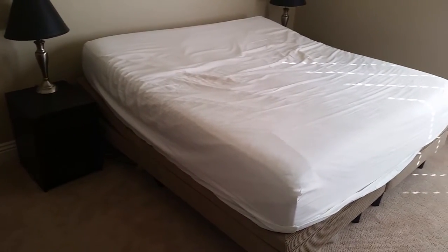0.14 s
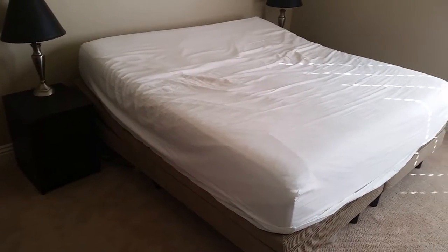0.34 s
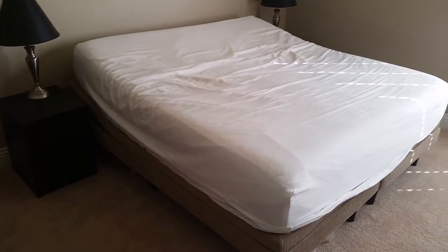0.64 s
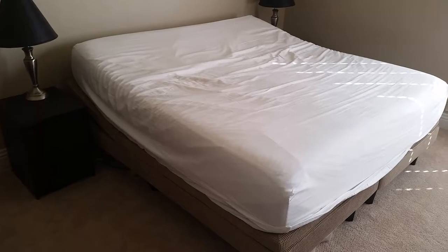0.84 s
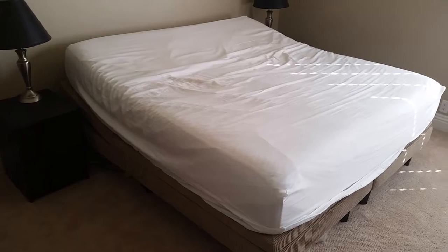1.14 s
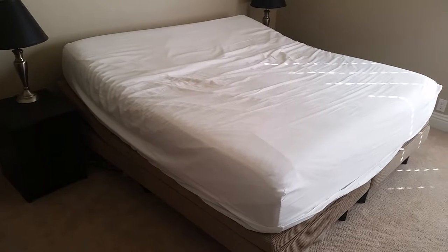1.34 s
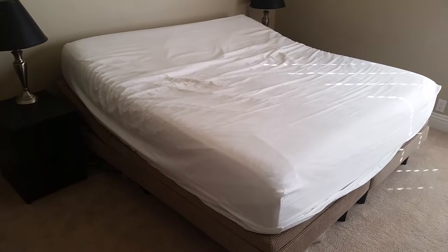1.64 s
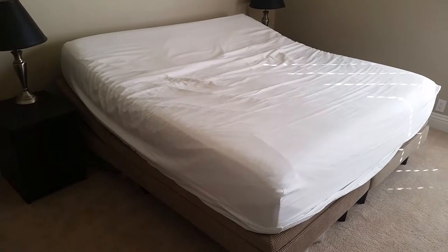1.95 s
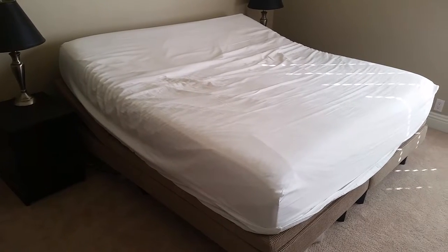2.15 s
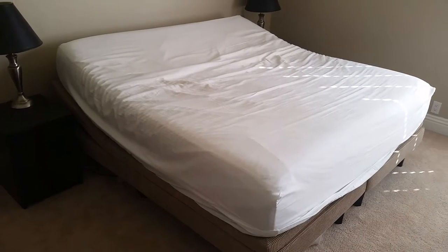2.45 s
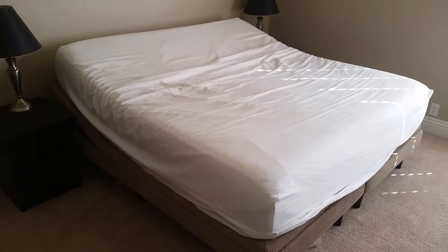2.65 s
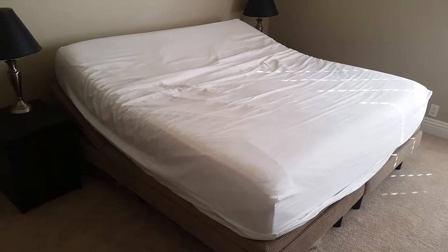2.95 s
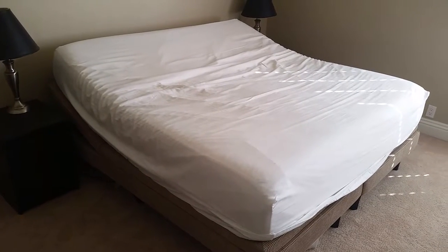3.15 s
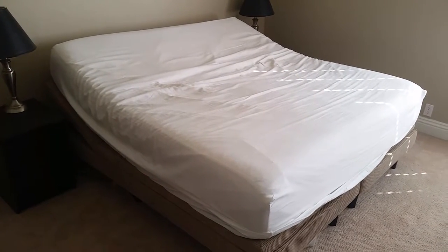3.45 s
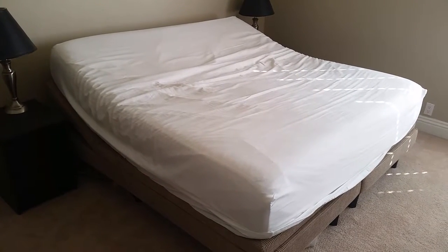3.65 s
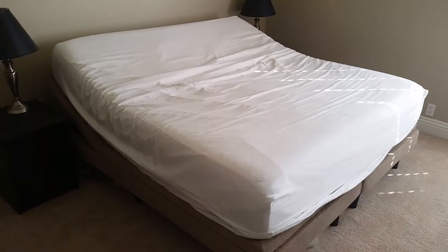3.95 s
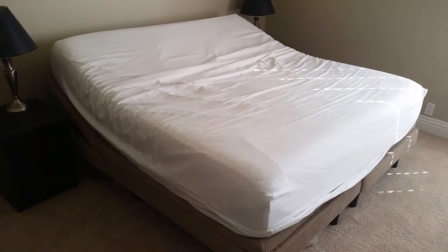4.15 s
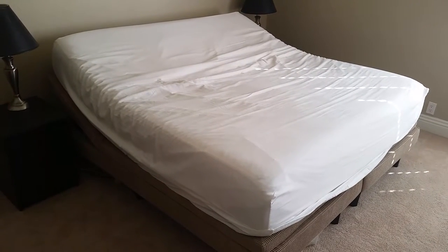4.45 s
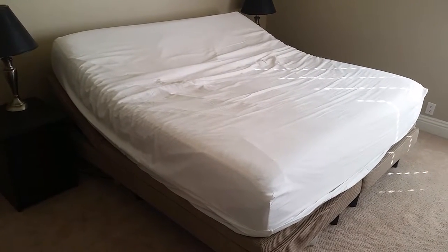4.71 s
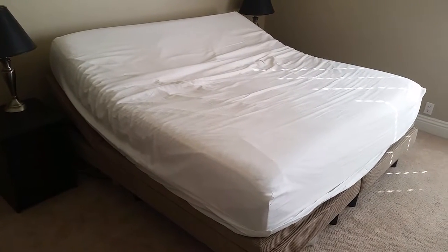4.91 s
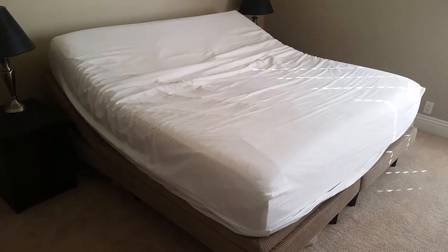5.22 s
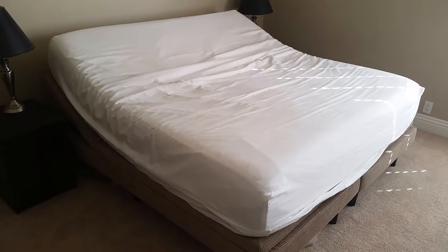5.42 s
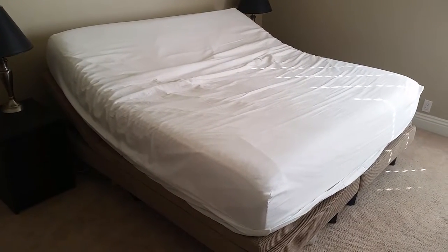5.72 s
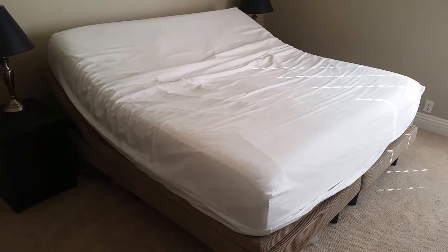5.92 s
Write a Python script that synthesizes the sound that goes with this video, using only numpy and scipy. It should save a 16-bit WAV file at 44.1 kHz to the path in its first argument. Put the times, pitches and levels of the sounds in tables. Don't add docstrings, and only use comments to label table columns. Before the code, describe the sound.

Low electric bed-lift drone with gear whirr in a quiet bedroom, ending in a shaky buzz and stop, then room hum with dull bumps and taps.

```python
import sys
import numpy as np
from scipy import signal
from scipy.fft import rfft, irfft, next_fast_len
from scipy.io import wavfile
from scipy.ndimage import uniform_filter1d

SR = 44100
rng = np.random.default_rng(int(sys.argv[2]) if len(sys.argv) > 2 else 0)


def elevation(decibels):
    levels = np.asarray(decibels, float)
    return 10 ** (levels / 20)


def put_to_file(sound):
    columns = np.atleast_2d(sound).T
    safe = np.clip(columns, -1, 1)
    whole_steps = np.round(safe * 32767)
    wavfile.write(sys.argv[1], SR, whole_steps.astype(np.int16))


N = 267907
STOP_S = 3.57


def at_hz(points, hz):
    f, value = np.transpose(points)
    return np.interp(np.log(hz + 1), np.log(f), value)


def in_time(rows):
    s, *columns = np.transpose(rows)
    return [np.interp(np.arange(N) / SR, s, c) for c in columns]


def pan(db):
    return elevation(np.array([[db / 2], [-db / 2]]))


def drift(rate):
    step = 40
    r = np.exp(-2 * np.pi * step * rate / SR)
    slow = signal.lfilter([1], [1, -2 * r, r * r], rng.standard_normal(N // step + 2002))
    slow = slow[2000:]
    return np.interp(np.arange(N) / step, np.arange(len(slow)), slow / slow.std())


def coloured(shape):
    size = next_fast_len(N)
    hz = np.fft.rfftfreq(size, 1 / SR)
    spectrum = rfft(rng.standard_normal(size)) * shape(hz)
    return irfft(spectrum * np.sqrt(SR / 2), size)[:N]


def band(points, hz, below_db, above_db):
    f, db = np.transpose(points)
    power = .6
    inside = np.interp(np.log(hz + 1), np.log(f), elevation(power * db)) ** (1 / power)
    below = np.maximum(np.log2(f[0] / (hz + 1)), 0)
    above = np.maximum(np.log2((hz + 1) / f[-1]), 0)
    return uniform_filter1d(inside, size=300) * elevation(-below_db * below - above_db * above)


def rumble():
    # f/Hz, level/dB per Hz
    spectrum = [(15, -104), (24, -93), (32, -82), (42, -83), (55, -73.5), (78, -79.5), (100, -70.5),
                (118, -73.5), (140, -78.5), (200, -80), (235, -83), (280, -88), (390, -88.5), (500, -92.5)]
    # f/Hz, likeness/1
    likeness = [(30, 0.45), (60, 0.5), (95, 0.88), (125, 0.8), (160, .9), (300, 0.94)]

    def mid_shape(hz):
        return elevation(at_hz(spectrum, hz)) / (1 + (hz / 600) ** 3) * (hz > 12)

    def side_shape(hz):
        alike = np.clip(at_hz(likeness, hz), 0, 1)
        return mid_shape(hz) * np.sqrt((1 - alike) / (1 + alike))

    mid, side = coloured(mid_shape), coloured(side_shape)
    return pan(-0.67) * elevation(1.3 * drift(5.7)) * (mid + side * [[1], [-1]])


def hiss(gain):
    # f/Hz, level/dB per Hz
    left_port = [(300, -87), (1200, -90.5), (1600, -100), (1920, -110), (2350, -93.5), (2700, -102),
                 (2950, -113), (3300, -102), (3900, -120), (4150, -114), (4400, -99), (4850, -91),
                 (5600, -106), (6300, -128)]
    # f/Hz, level/dB per Hz
    right_port = [(300, -89.5), (450, -92.5), (900, -97), (1250, -99.5), (1900, -109), (2500, -108),
                  (2950, -116.5), (3350, -116), (3900, -125.5), (4500, -116.5), (5300, -120), (5800, -128),
                  (6200, -138)]
    # f/Hz, level/dB per Hz
    top_hiss = [(6330, -136), (7550, -136), (7700, -135), (9500, -134), (10500, -130.5), (11500, -123),
                (12300, -118), (14000, -118.5), (15200, -115.5), (15740, -115.5)]

    def port(points):
        return coloured(lambda hz: band(points, hz, below_db=41, above_db=601.0))

    def top(hz):
        return band(top_hiss, hz, below_db=900, above_db=9000)

    ports = np.array([port(left_port), port(right_port)])
    left = elevation(-3.5 + .6 * drift(10.0)) * coloured(lambda hz: top(hz) * (hz > 7600))
    right = elevation(-1.1 + 0.47 * drift(9.2)) * coloured(top)
    return gain * ports + gain ** 1.4 * np.array([left, right])


def steady_motor():
    # f/Hz, level/dB, unsteadiness/0-1, wander rate/Hz, left-right/dB
    hum = [(54.35, -60, .85, 9.9, -4.5), (125, -60.5, .55, 4.0, -5), (240, -65, 1, 5, 7),
           (259.5, -55.5, 0.27, 4.0, -4), (386.2, -74, .8, 5.0, 1.5), (694.8, -73, 0.3, 1.3, 10),
           (777, -79, .95, 5.7, -7), (795, -80, .95, 4.0, -9), (1222, -83, 1, 5.4, -7)]
    t, out = np.arange(N) / SR, 0
    dip_from_s, dip_db, dip_edge_s = 2.78, -22, .05
    dip = dip_db * np.clip(np.minimum(t - dip_from_s, STOP_S + 0.015 - t) / dip_edge_s, 0, 1)
    for hz, db, loose, rate, lr_db in hum:
        phase = 2 * np.pi * hz * t
        firm = np.sqrt(2 * (1 - loose ** 2))
        in_phase = (firm + loose * drift(rate)) * np.sin(phase)
        quadrature = loose * drift(rate) * np.cos(phase)
        level = elevation(db + dip * (250 < hz < 270))
        out = out + pan(lr_db) * level * (in_phase + quadrature)
    return out


def loaded_motor(curve, orders, wobble, flicker_db):
    hz, level_db = in_time(curve)
    t = np.arange(N) / SR
    fade_in = np.clip((t - curve[0][0]) / .01 + 1, 0, 1)
    fade_out = np.clip((curve[-1][0] - t) / .02, 0, 1)
    turn = 2 * np.pi * np.cumsum(hz * (1 + wobble * drift(5.97))) / SR
    out = 0
    for k, db, lr_db, best_s, lasting_s in orders:
        weak = min(-db / 20, 1)
        swell_db = db - 6 * ((t - best_s) / lasting_s) ** 2 + flicker_db * weak * drift(3.4)
        start = rng.uniform(0, 2 * np.pi) + rng.normal(0, .1 * k ** .5, (2, 1))
        slip = 0.86 * weak * drift(2.8)
        out = out + pan(lr_db) * elevation(swell_db) * np.sin(k * turn + start + slip)
    return np.sqrt(2) * fade_in * fade_out * elevation(level_db) * out


def lifting():
    # t/s, tooth rate f/Hz, level/dB
    lift = [
        (0, 216.7, -50.5),
        (.15, 211.5, -49.5),
        (.82, 200.3, -49),
        (1.42, 199, -47),
        (1.66, 203.2, -47.5),
        (2.04, 197.7, -46),
        (2.77, 196.8, -46.5),
        (2.88, 208.2, -51),
        (3.05, 225.5, -52.5),
    ]
    # multiple of tooth rate/1, level/dB, left-right/dB, loudest t/s, lasting/s
    lift_orders = [(1, 1, -1.5, 1.3, 27), (2, -20.5, -1, 0.61, 4.2), (2.27, -18, -5.5, 2.45, 0.39),
                   (3, -21.5, 0.5, 1.3, 0.99), (4, -28.5, -3.5, 1.1, 1.4), (7, -43, -3, 1.2, 0.75),
                   (8, -36, -4, 2.2, 1), (8.75, -36.5, -8.5, 1.2, 1.6), (9.25, -31.5, -5, 1.6, 0.35),
                   (10, -31, -9, 0.98, 0.94), (10.15, -33, -12.5, 1.13, 0.32)]
    return loaded_motor(lift, lift_orders, wobble=.003, flicker_db=2.5)


def whirr():
    # f/Hz, level/dB per Hz
    colour = [(300, -5), (500, -4), (800, -4.5), (1200, -11.5), (1800, -3.5), (2300, -13.5), (3000, -29)]
    whirr_db, start_db, rise_s, fall_db_per_s = -68.5, -7, 0.92, 196
    t = np.arange(N) / SR
    noise = np.array([coloured(lambda hz: band(colour, hz, below_db=17.5, above_db=28.5)) for side in "LR"])
    build_db = start_db * np.maximum(1 - t / rise_s, 0)
    fall_db = fall_db_per_s * np.maximum(t - STOP_S, 0)
    return pan(-3) * elevation(whirr_db + build_db - fall_db) * noise / noise.std()


def puffs():
    # t/s, level/dB, length/s
    gusts = [
        (0.093, -45, 0.03),
        (1.12, -50, .02),
        (1.28, -52, .025),
        (1.518, -43.5, 0.13),
        (2.198, -50, 0.12),
        (2.882, -40, 0.055),
        (3.723, -49, 0.057),
        (5.516, -48, 0.04),
    ]
    t = np.arange(N) / SR
    low = coloured(lambda hz: (hz / 45) ** 2 / (1 + (hz / 45) ** 2) / (1 + (hz / 90) ** 4))
    lumps = sum(elevation(db) * np.exp(-((t - s) / length) ** 2) for s, db, length in gusts)
    return elevation([[-12], [0]]) * lumps * low / low.std()


def swing(s, db, hz, cycles, soft_s):
    out, t = np.zeros(N), np.arange(SR // 5) / SR
    at = round(s * SR)
    decay = elevation(-60 * t * hz / cycles)
    out[at:at + len(t)] = np.sin(2 * np.pi * hz * t) * decay * (1 - np.exp(-t / soft_s))
    return elevation(db + 2) * out


def taps():
    # t/s, peak level/dB, ring f/Hz, contact/s
    knocks = [
        (0.4674, -32, 373, 0.0011),
        (4.2735, -33.5, 403, 0.0022),
        (4.2944, -22, 438, 0.00302),
        (5.4544, -30.5, 375, 0.00097),
    ]
    # t/s, peak level/dB, f/Hz
    bumps = [
        (3.294, -30, 125),
        (3.31, -28, 125),
        (3.345, -31.5, 100),
        (3.377, -30.5, 70),
        (3.421, -33, 86),
        (3.431, -34, 59),
        (3.473, -39, 71),
        (3.746, -33.5, 91),
        (4.096, -35.5, 87),
        (4.305, -37, 240),
    ]
    ring_cycles, thud_cycles, bump_cycles = 10.0, 3.5, 9.8
    out = np.zeros(N)
    for s, db, hz, contact_s in knocks:
        thud_s = s - .0035 + 2.9 * contact_s
        out += swing(s, db + 3, hz, ring_cycles, contact_s)
        out += swing(thud_s, db - 1, .4 * hz, thud_cycles, 0.0011)
    for s, db, hz in bumps:
        out += swing(s, db, hz, bump_cycles, .0015)
    return elevation([[0], [-20.5]]) * out


def shuddering():
    # t/s, shaft rate f/Hz, level/dB
    shudder = [
        (2.77, 51.37, -60),
        (2.83, 51.57, -43),
        (3.0, 51.5, -48.5),
        (3.07, 49.16, -47),
        (3.125, 50.13, -54),
        (3.2, 51.3, -46),
        (3.33, 52.03, -50),
        (3.5, 51.4, -45),
        (3.59, 50.7, -53),
    ]
    # multiple of shaft rate/1, level/dB, left-right/dB, loudest t/s, lasting/s
    shudder_orders = [(4, -6.5, 2, 3.3, 0.68), (5.02, 2.5, -3.5, 3.33, 0.49), (6, -7, -2, 3.33, .33),
                      (8.8, -20, 6, 4, 0.2), (9.88, -19.5, 0, 3.3, 0.4), (10.96, -17.5, -4, 3.3, 0.25),
                      (13.25, -19.5, -4, 2.8, 0.56), (15.1, -23.5, 2, 4.4, 0.68),
                      (21.6, -27.5, -2, 3.6, 0.44), (24.7, -34, 1, 4.4, .4)]
    return loaded_motor(shudder, shudder_orders, wobble=0.00445, flicker_db=2.5)


def button():
    # t/s, peak level/dB
    ticks = [
        (3.635, -63),
        (3.645, -66),
    ]
    # f/Hz, level/dB per Hz
    colour = [(2500, 1), (4000, 0), (7000, -5), (10000, -11), (12300, 12.5), (14000, -8), (15600, -12)]
    t = np.arange(N) / SR
    bright = np.array([coloured(lambda hz: band(colour, hz, below_db=30, above_db=900)) for side in "LR"])
    decays = sum(elevation(db) * (t > s) * elevation(-60 * np.maximum(t - s, 0) / .015) for s, db in ticks)
    return decays * bright / bright.std()


def scene():
    # t/s, level/dB
    gain_curve = [(0, -66), (.5, -67.5), (1.4, -66), (2.7, -65), (3.72, -66), (3.9, -67.5), (4.7, -69.5),
                  (5.15, -68), (6.07, -69.5)]
    gain = elevation(in_time(gain_curve)[0] + 70)
    background = gain * (rumble() + steady_motor()) + hiss(gain)
    motor = lifting() + whirr() + shuddering()
    handling = puffs() + taps() + button()
    return background + motor + handling


def top_cut(x):
    return signal.sosfilt(signal.butter(12, 16590, fs=SR, output="sos"), x)


def record(dry):
    ends = np.clip(np.minimum(np.arange(N), np.arange(N)[::-1]) / 150, 0, 1)
    return top_cut(ends * (dry - .0005))


dry = scene()
out = record(dry)
put_to_file(out)
```